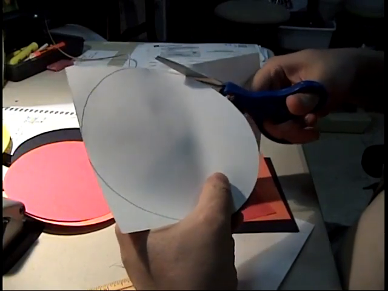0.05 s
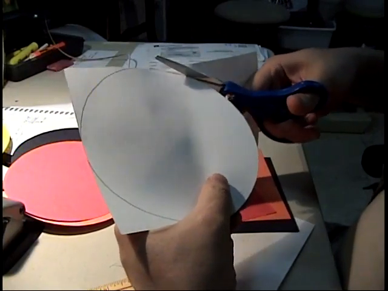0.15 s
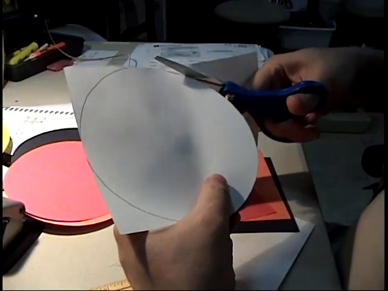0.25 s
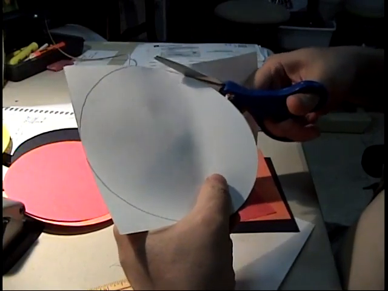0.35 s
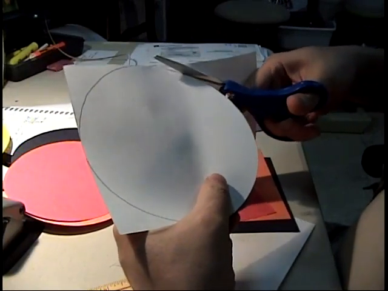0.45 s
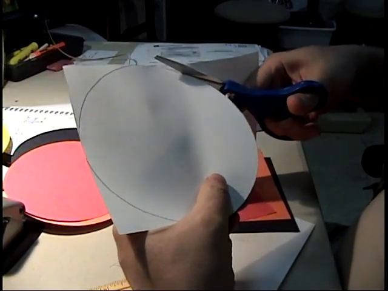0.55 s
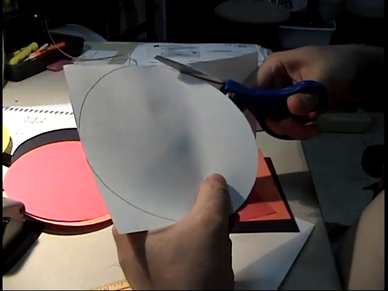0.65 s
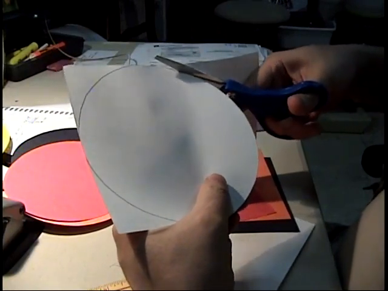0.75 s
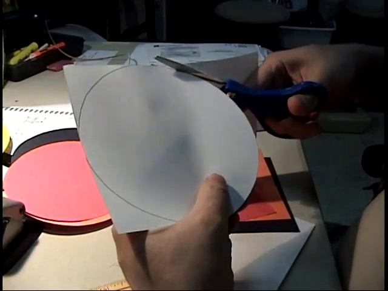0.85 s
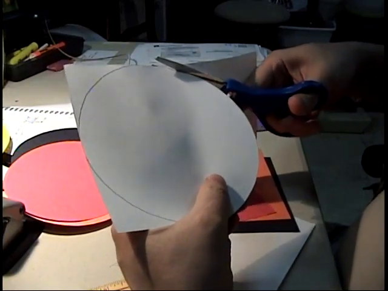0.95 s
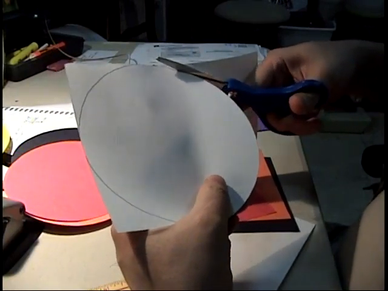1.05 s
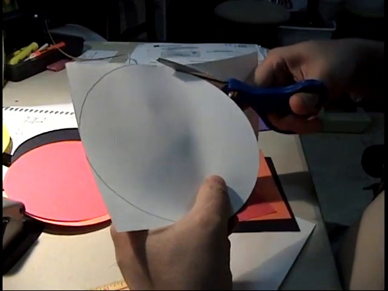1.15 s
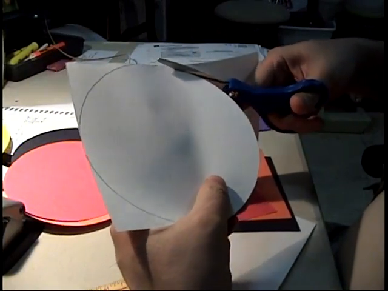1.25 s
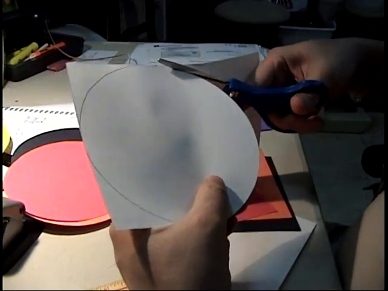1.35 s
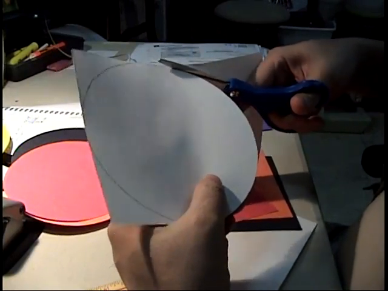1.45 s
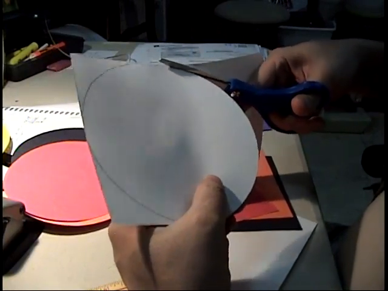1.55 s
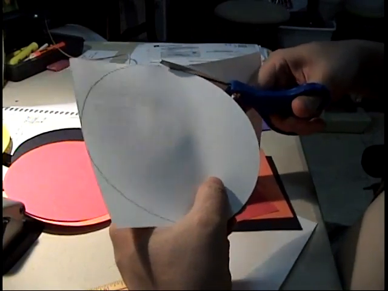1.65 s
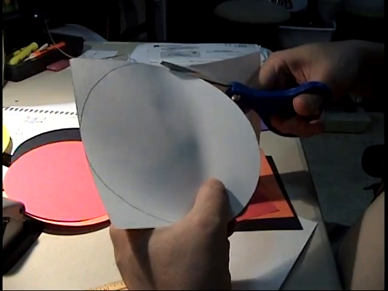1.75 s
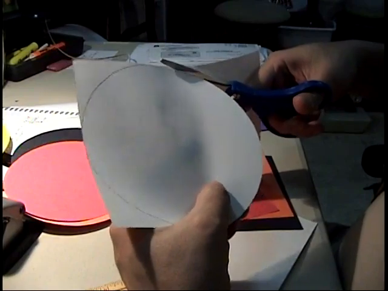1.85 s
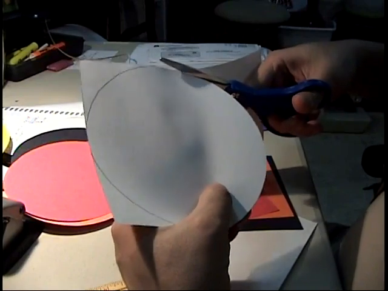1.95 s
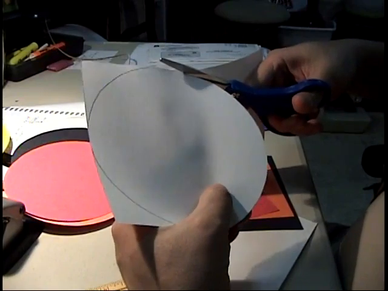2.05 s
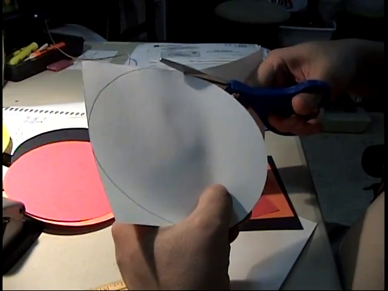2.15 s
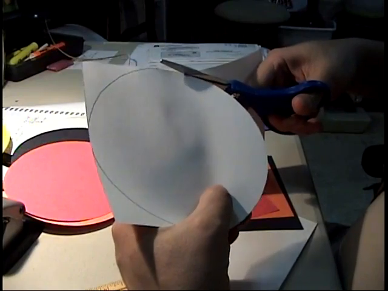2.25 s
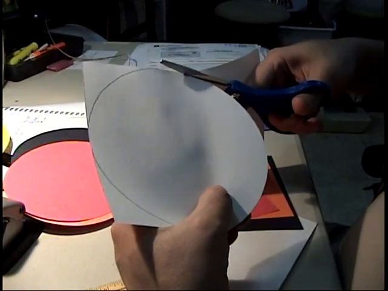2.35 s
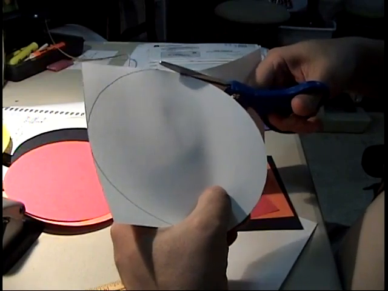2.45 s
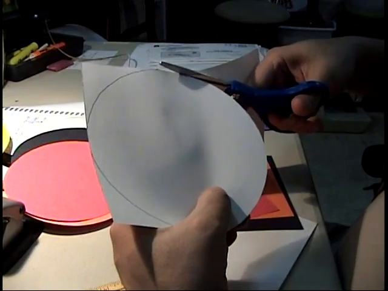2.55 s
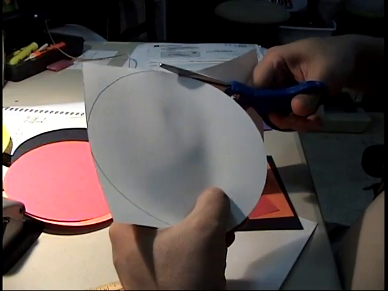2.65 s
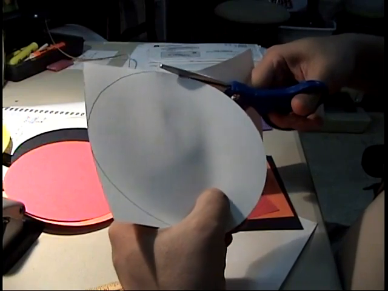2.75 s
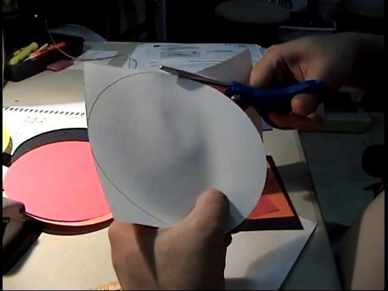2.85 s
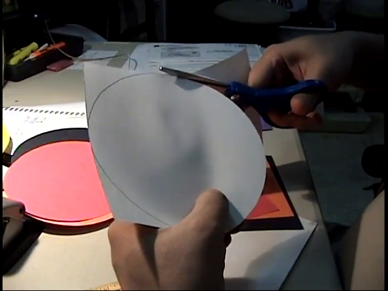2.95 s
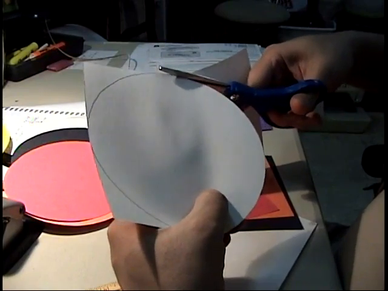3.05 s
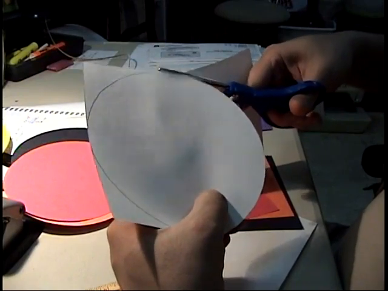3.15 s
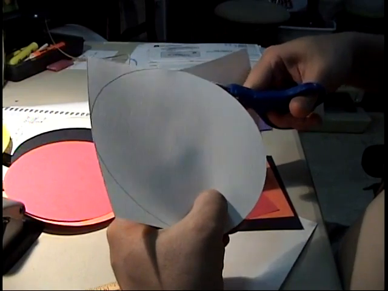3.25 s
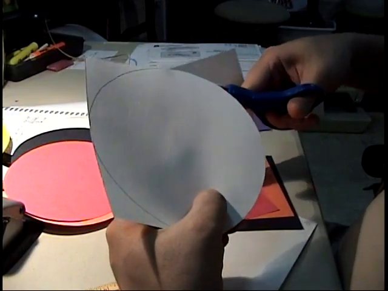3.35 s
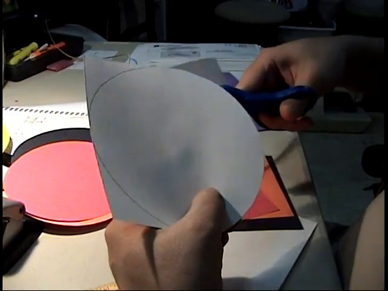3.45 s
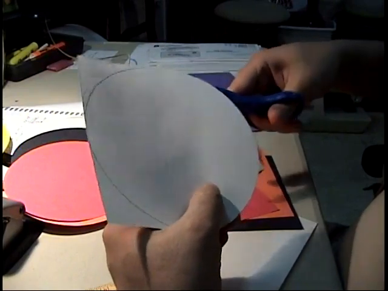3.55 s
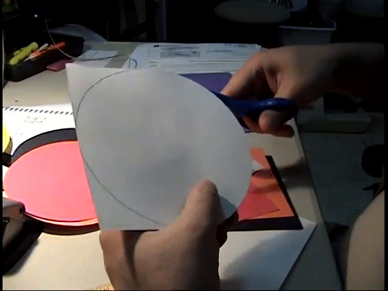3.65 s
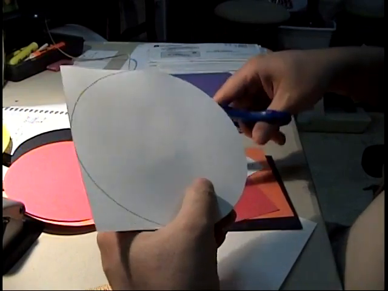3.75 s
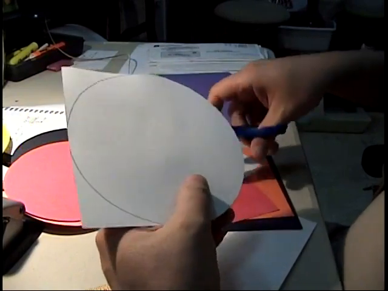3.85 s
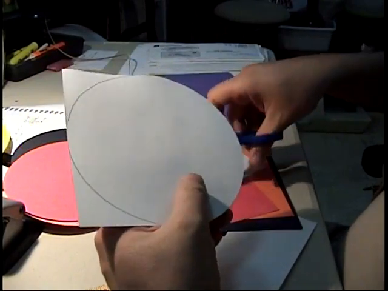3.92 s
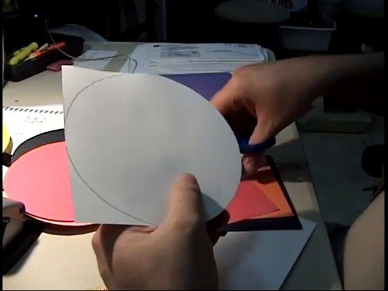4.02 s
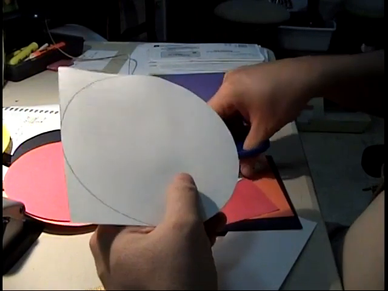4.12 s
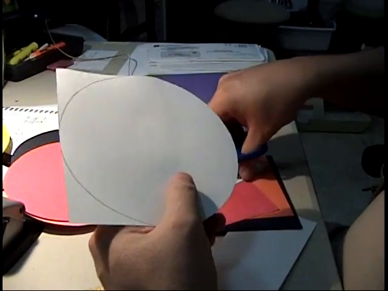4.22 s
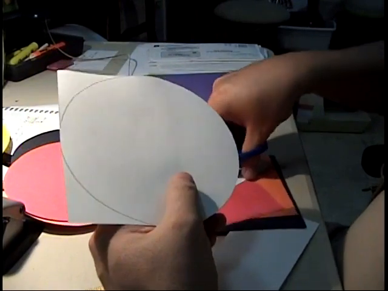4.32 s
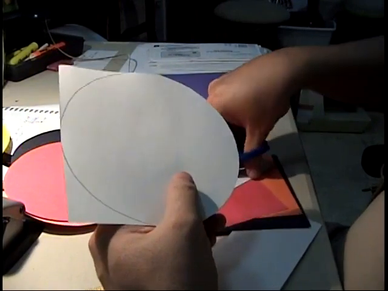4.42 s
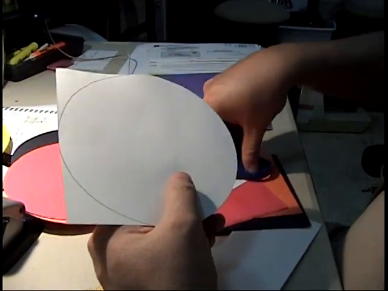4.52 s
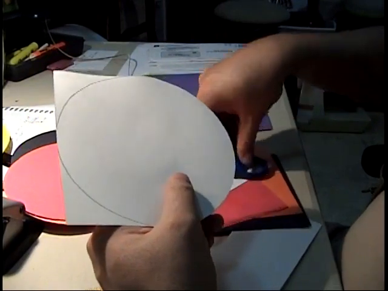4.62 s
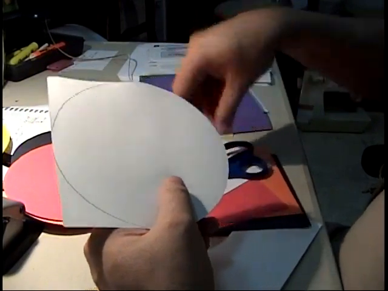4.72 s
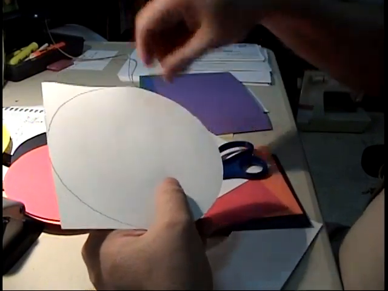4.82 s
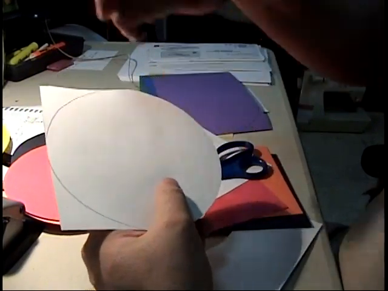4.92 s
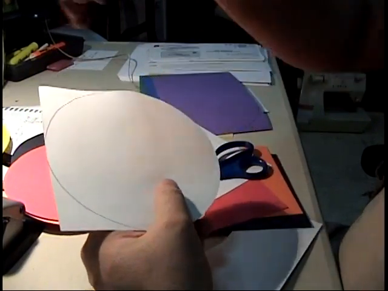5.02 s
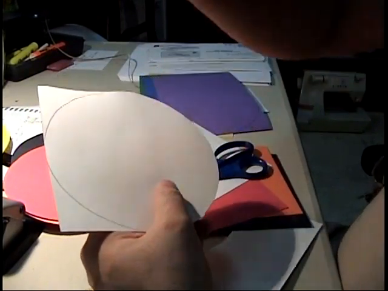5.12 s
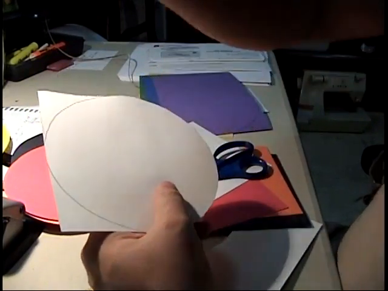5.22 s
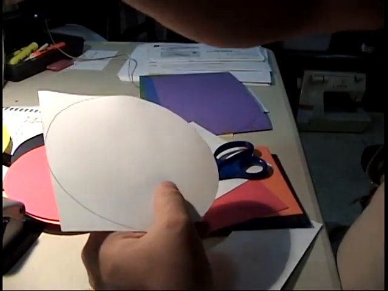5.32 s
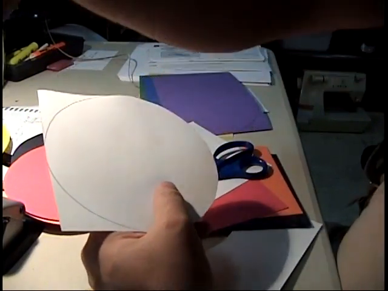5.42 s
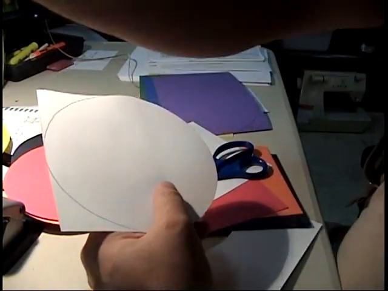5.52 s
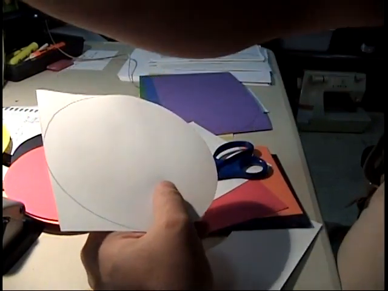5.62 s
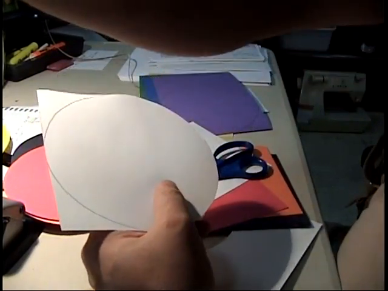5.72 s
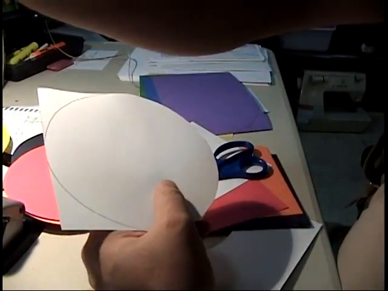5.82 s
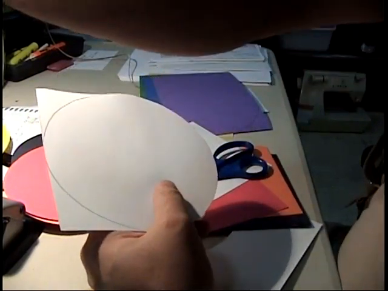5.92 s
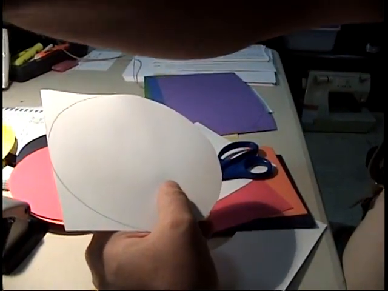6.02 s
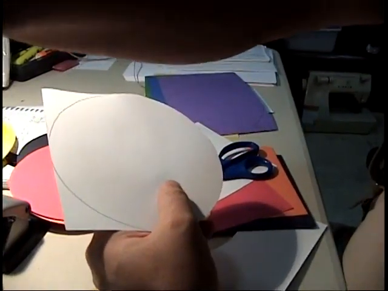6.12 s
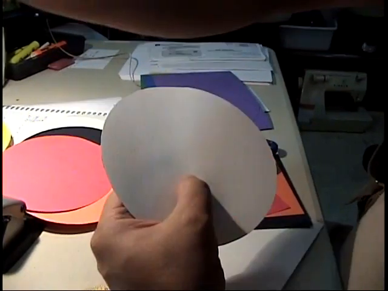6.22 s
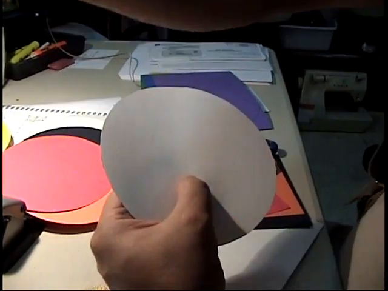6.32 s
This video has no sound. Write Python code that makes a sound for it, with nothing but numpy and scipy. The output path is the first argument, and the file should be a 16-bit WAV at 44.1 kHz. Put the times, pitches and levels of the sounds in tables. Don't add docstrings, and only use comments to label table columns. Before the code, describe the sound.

Crisp fibrous snips and faint metallic pings come from scissors working through a stiff sheet, which booms and pops as it bends. After a small metallic snap and soft rustles, the scissors land on a desk in two stages with a loud knock and a duller woody one. A few hollow plastic ticks, one much stronger, end it. Dry small room, close microphone, soft hum and faint mechanical buzz.

```python
import sys
import numpy as np
from scipy import signal
from scipy.fft import rfft, irfft, next_fast_len
from scipy.io import wavfile
from scipy.ndimage import map_coordinates

SR = 44100
rng = np.random.default_rng(int(sys.argv[2]) if len(sys.argv) > 2 else 0)


def waveform_to_disk(signal):
    frames = np.transpose(np.atleast_2d(signal))
    scaled = np.clip(frames, -1, 1) * 32767
    samples = np.round(scaled).astype(np.int16)
    wavfile.write(sys.argv[1], SR, samples)


def undo_db(level):
    steps = np.asarray(level, float) / 20
    return 10 ** steps


N = 281358


def unit(x):
    return x / np.sqrt(np.mean(x ** 2) + 1e-20)


def along(points, hz):
    f, v = np.transpose(points)
    return np.interp(np.log(hz + 1), np.log(f + 1), v)


def wobble(rate_hz):
    knots = rng.standard_normal(int(N * rate_hz / SR) + 4)
    return map_coordinates(knots, [np.arange(N) * rate_hz / SR], order=2)


def filtered(x, response):
    m = next_fast_len(N + 8192)
    return irfft(rfft(x, m) * response(np.fft.rfftfreq(m, 1 / SR)), m)[..., :N]


def coloured(x, spectrum):
    gain = undo_db(along(spectrum, np.fft.rfftfreq(2048, 1 / SR)))
    cepstrum = irfft(np.log(gain + 1e-6))
    cepstrum[1:1024] *= 2
    cepstrum[1025:] = 0
    h = irfft(np.exp(rfft(cepstrum)))
    return signal.fftconvolve(x, h / np.linalg.norm(h))[:N]


def no_bass(x, hz):
    return signal.sosfilt(signal.butter(2, hz, "high", fs=SR, output="sos"), x)


def add(track, start_s, sound):
    part = track[..., round(start_s * SR):][..., :sound.shape[-1]]
    part += sound[..., :part.shape[-1]]


def tone(hz, t60_s, attack_s=0.0022):
    t = np.arange(SR // 2) / SR
    return undo_db(-60 * t / t60_s) * np.sin(2 * np.pi * hz * t) * (1 - np.exp(-t / attack_s))


def ring(body, tilt_db=0, count=100):
    strength, decay = body
    t = np.arange(int(SR * np.max(decay, 0).min())) / SR
    slot, size, phase = rng.random((count, 3)).T[:, :, None]
    place = (np.arange(count)[:, None] + slot) / count
    hz = 70 * (16000 / 70) ** place
    t60_s = along(decay, hz)
    level_db = along(strength, hz) + 10 * np.log10(hz / t60_s) + tilt_db * np.log2(hz / 1000) + 6 * size
    modes = undo_db(level_db - 60 * t / t60_s) * np.sign(phase - .3) * np.sin(2 * np.pi * hz * t)
    x = np.sum(modes, 0) * (1 - np.exp(-t / 0.0004))
    return x / np.abs(x).max()


def crackle(spiky_db, rate_hz):
    return unit(undo_db(spiky_db * wobble(rate_hz)) * rng.standard_normal(N))


# frequency in Hz, level in dB per Hz.
FIBRE_SPECTRUM = [(880, -36.5), (1500, -1), (1670, -6), (2140, -3), (2320, -2.5), (3840, -4.5),
                  (4730, -5.5), (8830, -10), (12500, -16.5), (15500, -31)]
# frequency in Hz, level in dB per Hz.
SHEET_SPECTRUM = [(290, -32), (500, -3.5), (924, 4), (1180, 3.5), (1500, -0.5), (1880, -3.5), (2600, -11),
                  (3380, -39), (5720, -120)]
# start in seconds, peak in dB, sheet boom in dB.
FIRST_BITES = [(0.0046, -42, -2), (0.0151, -40.5, 3), (0.026, -46, 11), (0.2803, -44, 4), (0.3089, -29, -6),
               (0.3146, -35, 0), (0.395, -37, -13), (0.4723, -34, -11), (0.5071, -26.5, -3),
               (0.527, -44, -6), (0.558, -35.5, 4.5), (0.5626, -33.5, -3), (0.5937, -35.5, -4),
               (0.6018, -38, -0.5), (0.6371, -35.5, -19), (0.6488, -42, -4), (0.662, -37, -1),
               (0.685, -41, -14), (0.694, -33, -15), (0.727, -40, -15), (0.7588, -34.5, -2),
               (0.775, -42, 0), (0.781, -38, -7), (0.824, -43.5, 3)]
# start in seconds, peak in dB, sheet boom in dB.
SECOND_BITES = [(1.019, -33, 1), (1.0231, -33.5, 0), (1.03, -40, -4), (1.046, -35, -6), (1.0799, -48.5, 21),
                (1.0883, -40, -3), (1.097, -33, -2), (1.1006, -43, 11), (1.1099, -39, 7),
                (1.2114, -36, 5.5), (1.2157, -36.5, 9), (1.239, -28.5, 3.5), (1.2492, -37, 5),
                (1.2731, -48, -1), (1.285, -35.5, 5), (1.2904, -44, 3), (1.2956, -33, 3), (1.3072, -43, 1),
                (1.3758, -43, 9.5), (1.4383, -36, 14.5), (1.4602, -44, 11), (1.478, -33, 5),
                (1.4862, -38, 7.5), (1.526, -39, 2), (1.647, -50, 11), (1.7005, -50, 3)]
# start in seconds, peak in dB, sheet boom in dB.
LAST_BITES = [(2.288, -45, 11.5), (2.3096, -45, 7), (2.321, -41.5, 5.5), (2.3686, -41, 2),
              (2.401, -38.5, 7), (2.503, -38, 0.5), (2.6113, -47, -4), (2.724, -40, -7), (2.7317, -49, -10),
              (2.7421, -47, -1), (2.866, -38, -15), (2.9887, -36.5, 5.5), (3.013, -36, 5), (3.062, -36, -1),
              (3.068, -35, 11.5), (3.4317, -49, 1), (3.532, -47, -14), (3.6098, -42, -3)]
# ring frequency in Hz, ring level in dB, bite fade in ms.
BLADE_RINGS = [
    (4450, -10, 21.1),
    (5540, -24, 24),
    (4660, -9.5, 41),
]
# start in seconds, peak in dB,
# ring frequency in Hz.
STEEL_PINGS = [(0.0046, -42, 2700), (0.027, -40, 2370), (0.661, -42, 4550), (0.691, -45, 4540),
               (0.728, -43, 4470), (0.824, -42, 2380), (1.019, -39, 1760), (1.0799, -45, 1300),
               (1.2161, -40, 3160), (1.4392, -33.5, 6100), (1.4832, -37, 2480), (1.5354, -37, 2300),
               (1.5767, -44, 2100), (1.6471, -31, 1720), (2.216, -51, 5040), (2.315, -43, 4350),
               (2.646, -46, 3070), (3.0688, -36, 3770), (3.473, -38.5, 2430), (3.583, -40.5, 3500),
               (4.9223, -42, 2300), (0.4727, -47, 4400), (0.6018, -45, 4500), (0.7596, -41, 4460),
               (1.0226, -38, 4400), (1.0453, -45, 4370), (2.055, -41, 2500), (3.533, -48.5, 11000),
               (6.0434, -40, 2530)]


def cutting():
    grains = crackle(spiky_db=0.5, rate_hz=900)
    t = np.arange(SR // 16) / SR
    onset = (1 - np.exp(-t / 0.00061)) * (0.45 + 1.4 * np.exp(-t / 0.0006))
    fibre, sheet, blade = np.zeros((3, N))

    def burst(start_s, db, fade_ms):
        return grains[round(start_s * SR):][:len(t)] * undo_db(db - 6.5 - 60000 * t / fade_ms) * onset

    def steel(x, hz):
        return undo_db(19) * signal.lfilter(*signal.iirpeak(hz, 18, SR), x)

    for bites, (hz, ring_db, fade_ms) in zip((FIRST_BITES, SECOND_BITES, LAST_BITES), BLADE_RINGS):
        for start_s, db, boom_db in bites:
            bite = burst(start_s, db, fade_ms)
            add(fibre, start_s, bite)
            add(sheet, start_s, undo_db(boom_db) * bite)
            add(blade, start_s, undo_db(ring_db) * steel(bite, hz))
    for start_s, db, hz in STEEL_PINGS:
        add(blade, start_s, steel(burst(start_s, db, fade_ms=28), hz))
    return coloured(fibre, FIBRE_SPECTRUM) + coloured(sheet, SHEET_SPECTRUM) + blade


# peak time, rise and fall in seconds, hiss in dB, sheet boom in dB.
STROKES_ON_CARD = [(0.0, .01, 0.22, -65, -8), (.32, 0.1, 0.069, -59.5, 0.5), (.734, .25, 0.0071, -64.5, -8),
                   (.762, 0.0063, 0.041, -52, 2), (1.02, 0.0038, 0.078, -55.5, -1.5),
                   (1.213, .008, 0.22, -57, 6), (1.434, 0.0034, .4, -65, 5.5), (1.73, 0.11, .02, -67, 8),
                   (1.66, .015, .06, -60, 3), (1.75, .005, .05, -54, 1), (1.796, .04, 0.038, -48, 0),
                   (1.866, 0.0033, 0.046, -48, -1), (1.91, 0.045, 0.0067, -55.5, -7),
                   (2.41, 0.75, .006, -65.5, -19), (2.65, 0.078, 0.035, -58.5, -1),
                   (2.728, 0.028, .06, -53.5, -3), (2.868, 0.043, 0.014, -56, 1),
                   (3.062, .05, 0.05, -55.5, -5), (3.446, 0.2, 0.17, -65.5, 2.5),
                   (3.596, 0.073, 0.033, -56.5, -17), (3.72, 0.1, 0.28, -67, 2), (4.03, 0.37, .02, -71, -5),
                   (4.18, 0.044, .2, -64, 5), (5.224, 0.57, .9, -64, -1), (4.25, .1, .1, -64, -3)]
# start and stop in seconds, level in dB.
HELD_SHEET = [
    (0.0, .95, -67),
    (1.92, 3.11, -66.5),
    (4.152, 4.381, -69.5),
    (5.697, 5.81, -69),
]


def sliding():
    hiss, boom = np.zeros((2, N))
    t = np.arange(N) / SR
    for peak_s, rise_s, fall_s, db, boom_db in STROKES_ON_CARD:
        swell = undo_db(db - 15 * np.maximum((peak_s - t) / rise_s, (t - peak_s) / fall_s))
        hiss += swell
        boom += undo_db(boom_db) * swell
    for start_s, stop_s, db in HELD_SHEET:
        boom += undo_db(db) * (t > start_s) * (t < stop_s)
    clumps = unit(undo_db(2.8 * wobble(60)))
    fibre = coloured(crackle(spiky_db=3.5, rate_hz=1600), FIBRE_SPECTRUM)
    sheet = coloured(crackle(spiky_db=3.5, rate_hz=700), SHEET_SPECTRUM)
    return clumps * (hiss * fibre + boom * sheet)


# start and stop in seconds, resonance in Hz, level in dB.
BLADE_SONGS = [
    (0.62, .79, 4470, -66),
    (1.273, 1.325, 6070, -60),
    (3.41, 3.47, 5900, -60.5),
    (3.684, 3.8, 5800, -65.5),
]


def rasp():
    x = np.zeros(N)
    for start_s, stop_s, hz, db in BLADE_SONGS:
        grit = crackle(spiky_db=1, rate_hz=98)[:round((stop_s - start_s) * SR)]
        song = unit(signal.lfilter(*signal.iirpeak(hz, 11, SR), grit))
        add(x, start_s, undo_db(db) * signal.windows.tukey(len(grit), .4) * song)
    return x


# frequency in Hz, level in dB per Hz.
HARD_SPECTRUM = [(1500, -41), (3500, 5), (7000, 1), (11000, -7.5), (16000, -29)]
# start and stop in seconds, level in dB.
SHEAR_STROKES = [
    (1.741, 1.826, -48),
    (1.859, 1.915, -56),
    (4.17, 4.34, -62),
]


def shearing():
    x = np.zeros(N)
    for start_s, stop_s, db in SHEAR_STROKES:
        grit = crackle(spiky_db=4, rate_hz=500)[:round((stop_s - start_s) * SR)]
        add(x, start_s, undo_db(db) * signal.windows.tukey(len(grit), .2) * grit)
    return coloured(x, HARD_SPECTRUM)


# start in seconds, peak in dB, lowest mode in Hz, t60 in seconds.
CARD_POPS = [(1.243, -40, 288, .05), (1.868, -42, 330, .05), (1.347, -27, 230, 0.029),
             (1.594, -35, 206.5, 0.033), (1.6, -32.5, 276, 0.034), (1.618, -38, 227, .04),
             (1.647, -38, 452, 0.049), (1.659, -43, 485, 0.091), (3.066, -36.5, 280, 0.085)]
# start in seconds, peak in dB, hardness in dB per octave.
BLADE_SNAP = [
    (3.099, -24, 0),
]
# strength in rows of Hz, dB; decay in rows of Hz, t60 in seconds.
HANDLE_BODY = [(120, -37), (200, -3), (700, -1), (1200, 2), (1530, -5), (1820, -10), (2900, -26),
               (5000, -40), (6500, -67), (11000, -120)], [(250, 0.089), (1000, 0.04), (3000, 0.037)]
# start in seconds, peak in dB, hardness in dB per octave.
BLADE_LANDINGS = [
    (4.065, -11.5, 0),
    (4.083, -17.5, 0),
    (4.107, -30, 0),
    (4.122, -27.5, -2.5),
    (4.138, -32.5, -0.5),
]
# strength in rows of Hz, dB; decay in rows of Hz, t60 in seconds.
DESK_UNDER_STEEL = [(59, -42), (100, -11.5), (217, 1), (330, -21), (383, -10), (633, -5), (923, -8),
                    (1260, -1), (1590, -22), (1810, -10), (2370, -17.5), (2630, -11), (2860, -20.5),
                    (15000, -60)], [(100, 0.19), (400, 0.12), (1200, 0.054), (2000, 0.031), (3000, 0.045),
                    (8000, 0.014)]
# start in seconds, peak in dB, hardness in dB per octave.
GRIP_LANDINGS = [
    (4.381, -42, 3),
    (4.388, -23, 3),
    (4.42, -31, -1),
    (4.509, -43, 4),
]
# strength in rows of Hz, dB; decay in rows of Hz, t60 in seconds.
DESK_UNDER_GRIPS = [(150, -24), (260, 0), (375, 3), (516, -11), (1030, -13), (1350, -29), (1570, -28),
                    (2180, -49), (4000, -54), (5200, -73), (8800, -120)], [(300, 0.1), (600, 0.11),
                    (1000, 0.072), (3000, 0.052)]
# start in seconds, level in dB, frequency in Hz, t60 in seconds.
BOARD_MODES = [(4.067, -23, 155, 0.22), (4.069, -45.5, 200.6, 0.88), (4.391, -35, 352, 0.22),
               (4.39, -31, 200, 0.3), (4.393, -34, 110, 0.35), (4.393, -38, 82, .3), (4.391, -40, 738, .18)]
# start in seconds, level in dB, frequency in Hz, t60 and palm time in seconds.
BOARD_UNDER_PALM = (4.3918, -21.5, 141.5, .8, 4.464)
# start in seconds, level in dB, frequency in Hz, t60 in seconds.
HARD_KNOCKS = [(3.069, -37, 1700, .02), (3.071, -40, 2150, .025), (3.069, -43, 3050, .02),
               (3.1, -27, 1250, .015), (3.1, -40, 2200, .03), (3.1, -35, 300, .07),
               (4.0658, -14, 1400, .01), (4.0665, -26, 650, .05), (4.084, -26, 1250, .025),
               (4.084, -33, 800, .06), (4.125, -38, 820, .1), (4.391, -23, 170, .04),
               (4.509, -47, 1050, .06), (1.7, -40, 1500, .015), (1.4775, -45, 6400, .02),
               (1.023, -46, 11200, .008), (1.046, -48, 13000, .008), (1.099, -48, 11200, .008),
               (1.0235, -38, 1900, .025), (0.6615, -47, 4520, .015), (0.728, -47, 4470, .015)]


def handling():
    x = np.zeros(N)
    for start_s, db, hz, t60_s in CARD_POPS:
        overtones = tone(2.32 * hz, 0.89 * t60_s) + tone(4.14 * hz, 0.37 * t60_s)
        add(x, start_s, undo_db(db) * (tone(hz, t60_s) + undo_db(-4) * overtones))
    for start_s, db, hz, t60_s in BOARD_MODES:
        add(x, start_s, undo_db(db) * tone(hz, t60_s))
    for start_s, db, hz, t60_s in HARD_KNOCKS:
        add(x, start_s, undo_db(db) * tone(hz, t60_s, attack_s=.0002))

    start_s, db, hz, t60_s, palm_s = BOARD_UNDER_PALM
    pressed_s = np.maximum(start_s + np.arange(SR // 2) / SR - palm_s, 0)
    palm_db = -8 * np.minimum(pressed_s / .008, 1) - 60 * pressed_s / .3
    add(x, start_s, undo_db(db + palm_db) * tone(hz, t60_s))

    landings = (BLADE_SNAP, HANDLE_BODY), (BLADE_LANDINGS, DESK_UNDER_STEEL), (GRIP_LANDINGS, DESK_UNDER_GRIPS)
    for blows, body in landings:
        for start_s, db, hard_db in blows:
            add(x, start_s + 0.001026, undo_db(db) * ring(body, hard_db))
    return signal.sosfilt(signal.butter(3, 95, "high", fs=SR, output="sos"), x)


# start in seconds, level in dB, t60 in seconds.
CONTACT_CRACKS = [
    (4.066, -23, .01),
    (5.8885, -44, 0.0075),
    (6.0443, -29, .004),
    (4.421, -52, .012),
]


def cracks():
    x = np.zeros(N)
    t = np.arange(SR // 40) / SR
    for start_s, db, t60_s in CONTACT_CRACKS:
        add(x, start_s, undo_db(db - 60 * t / t60_s) * rng.standard_normal(len(t)))
    return coloured(x, HARD_SPECTRUM)


# start in seconds, peak in dB, left-right in dB, tilt in
# dB per octave, rocking in dB.
SHELL_TICKS = [(5.714, -49, 7, 2, 6), (5.794, -50, 3, -3, 4), (5.812, -43, 2, 1.5, 3),
               (5.889, -41, 9, -2, 8), (5.9105, -36, 6, 1, 1), (5.9955, -36, 8, -3, -2),
               (6.013, -48, 0, 4, 3), (6.111, -42.5, 9, -3, 4), (6.155, -40, -6, -6, -6),
               (6.0443, -19, -3, -1, 10),
]
# strength in rows of Hz, dB; decay in rows of Hz, t60 in seconds.
SHELL_BODY = [(120, -49), (200, -20), (550, -8), (750, -11), (1000, -2), (1380, -1.5), (1980, -14),
              (2290, -11.5), (3010, -12.5), (3470, -23), (4160, -23), (15000, -43)], [(300, 0.022),
              (1000, 0.053), (1400, 0.025), (2500, 0.012), (8000, .005)]
# start in seconds, level in dB, frequency in Hz, t60 in seconds, left-right in dB.
NAIL_CLICKS = [(5.8885, -45, 8600, .01, 4), (5.889, -38, 1000, .018, 6), (5.911, -32, 1900, .013, 5),
               (5.911, -37, 3100, .009, 4), (5.9955, -29, 900, .015, 6), (6.0145, -47, 3200, .01, 0),
               (6.0445, -21, 1050, .018, -2), (6.0445, -29, 2550, .014, 0), (6.0445, -23, 1550, .014, -2),
               (6.0445, -26, 540, .028, -2)]


def finger():
    x = np.zeros((2, N))

    def panned(db, pan_db):
        return undo_db(db + np.array([[pan_db], [-pan_db]]) / 2)

    for start_s, db, pan_db, tilt_db, rock_db in SHELL_TICKS:
        both = ring(SHELL_BODY, tilt_db)
        rock = undo_db(rock_db) * ring(SHELL_BODY, tilt_db)
        held = np.clip((.02 - np.arange(len(both)) / SR) / .003, .05, 1)
        add(x, start_s, panned(db, pan_db) * held * np.array([both + rock, both - rock]))
    for start_s, db, hz, t60_s, pan_db in NAIL_CLICKS:
        add(x, start_s, panned(db, pan_db) * tone(hz, t60_s, attack_s=.0002))
    return no_bass(x, hz=120)


# frequency in Hz, t60 in seconds.
ROOM_DECAY = [(150, 0.25), (1000, 0.23), (4000, 0.18), (12000, 0.16)]


def room(x):
    hz, t, z = signal.stft(rng.standard_normal((2, SR // 3)), SR, nperseg=256)
    z[1] *= (hz / (hz + 900))[:, None]
    fade = undo_db(-60 * t / along(ROOM_DECAY, hz)[:, None])
    mid, side = signal.istft(z * fade, SR, nperseg=256)[1]
    side = no_bass(side, hz=200)
    tail = np.array([mid + 1.3 * side, mid - 1.6 * side]) / np.linalg.norm(mid)
    return signal.fftconvolve(np.pad(x, (200, 0))[None], tail, axes=1)[:, :N]


# frequency in Hz, level in dB.
SCAN_TONES = [(7882.2, -92), (15734.3, -81.5), (15719.3, -90), (15674.4, -97), (6374, -79), (6600, -86)]
# frequency in Hz, level in dB.
DRUM_SPECTRUM = [(1300, -43), (1800, -4), (2600, -16), (3500, -2.5), (3900, -7), (4200, -4.5), (4500, -7),
                 (5100, -9), (5400, -2), (5700, -9), (7500, -36)]
# time in seconds, level in dB.
BUZZ_LEVEL = [(0, -74), (2, -85), (4, -72.5), (4.6, -77), (5.2, -74), (5.6, -68.5), (5.9, -69.5),
              (6.06, -74), (6.09, -65.5), (6.38, -64)]


def camera():
    drum_hz, half_line_hz, flip_hz, half_line_db = 299.7, 7867.2, 14.985, -72.5
    t = np.arange(N) / SR
    tones = np.zeros(N)
    for hz, db in SCAN_TONES:
        tones += np.sqrt(2) * undo_db(db) * np.sin(2 * np.pi * (hz * t + rng.random()))
    flip = np.pi / 2 * np.tanh(12 * np.sin(2 * np.pi * flip_hz * t))
    tones += np.sqrt(2) * undo_db(half_line_db) * np.sin(2 * np.pi * half_line_hz * t + flip)

    harmonics = np.arange(5, 25)[:, None]
    beats = np.cos(2 * np.pi * drum_hz * harmonics * t + .6 * rng.standard_normal((20, 1)))
    slaps = filtered(beats.sum(0), lambda hz: undo_db(along(DRUM_SPECTRUM, hz)))

    def with_echo():
        return slaps + .45 * np.interp(t - .0003 * wobble(1.5), t, slaps)

    buzz = unit(np.array([with_echo(), with_echo()]))
    return tones + undo_db(np.interp(t, *np.transpose(BUZZ_LEVEL))) * buzz


# frequency in Hz, level in dB per Hz.
AIR_SPECTRUM = [(12, -58), (20, -14), (63, -4), (123, -16.5), (158, -7), (542, -9.5), (642, -16),
                (698, -13.5), (1190, -13), (2600, -27.5), (6180, -28), (7110, -31), (7730, -32),
                (8890, -36.5), (16000, -47)]
# frequency in Hz, correlation from -1 to 1.
AIR_LIKENESS = [(60, 1), (130, 0.68), (290, 0.9), (640, 0.4), (1410, -0.49), (3100, -0.041), (6820, 0.22),
                (15000, 0.22)]
# frequency in Hz, width in Hz, level in dB.
HUM_BANDS = [(59.1, .8, -64), (156.5, 2, -64.5), (241, 3, -68), (116.2, 7, -72)]


def air():
    beat_hz, beat_peak_s, beat_depth = .9, .4, .75
    t = np.arange(N) / SR

    def mid_side(hz):
        angle = np.arccos(np.clip(along(AIR_LIKENESS, hz), -1, 1)) / 2
        return undo_db(along(AIR_SPECTRUM, hz)) * [np.cos(angle), np.sin(angle)]

    mid, side = filtered(rng.standard_normal((2, N)), mid_side)
    hiss = undo_db(-54 + 0.084 * wobble(2.92)) * unit(np.array([mid + side, mid - side]))

    hum = np.zeros(N)
    for hz, width_hz, db in HUM_BANDS:
        drift = np.cumsum(rng.standard_normal(N)) * np.sqrt(width_hz / SR / (2 * np.pi))
        hum += undo_db(db + 3 + 1.3 * wobble(5)) * np.sin(2 * np.pi * (hz * t + drift))
    beat = 1 + beat_depth * np.cos(2 * np.pi * beat_hz * (t - beat_peak_s))
    upper = no_bass(hum, hz=90)
    return hiss + upper + beat * (hum - upper)


def scene():
    work = cutting() + sliding() + rasp() + handling()
    taps = finger()
    echoes = undo_db(-12) * room(work) + undo_db(-52) * room(taps[0])
    return work + taps + echoes + cracks() + shearing() + camera() + air()


def low_pass(x):
    return signal.sosfilt(signal.butter(12, 16740, fs=SR, output="sos"), x)


def record(dry):
    mix = filtered(dry, lambda hz: 1 / (1 + (hz / 16300) ** 40))
    return low_pass(mix)


dry = scene()
out = record(dry)
waveform_to_disk(out)
```